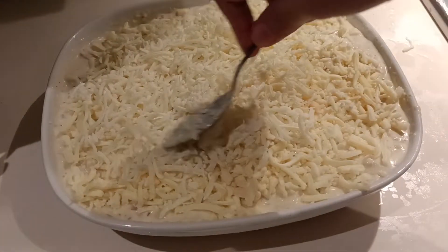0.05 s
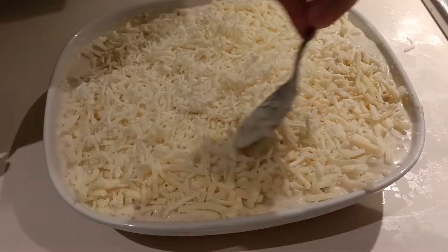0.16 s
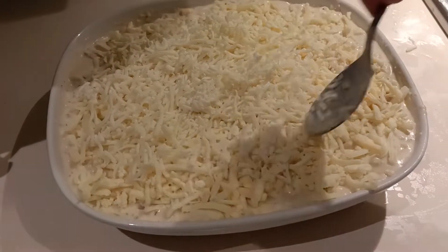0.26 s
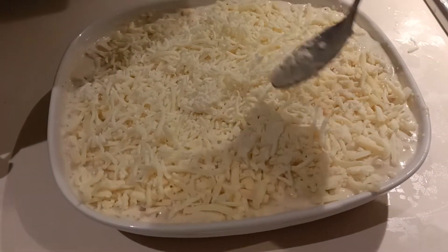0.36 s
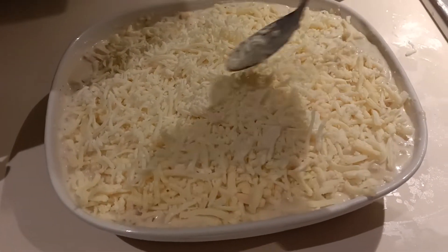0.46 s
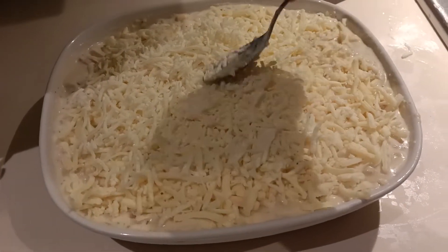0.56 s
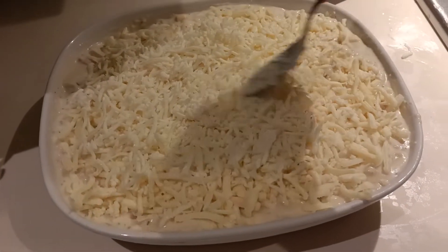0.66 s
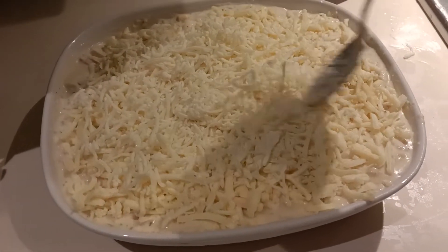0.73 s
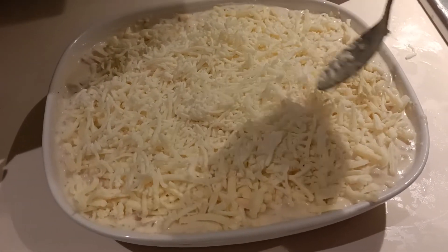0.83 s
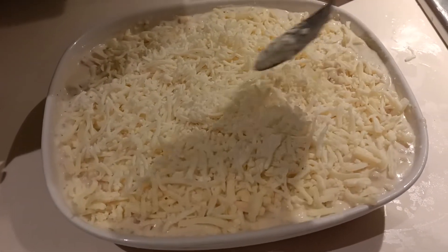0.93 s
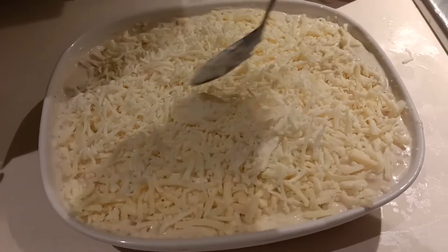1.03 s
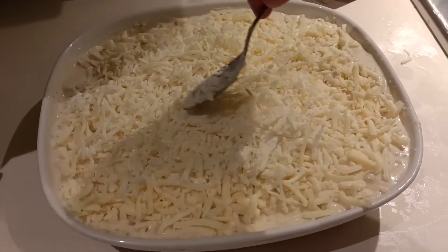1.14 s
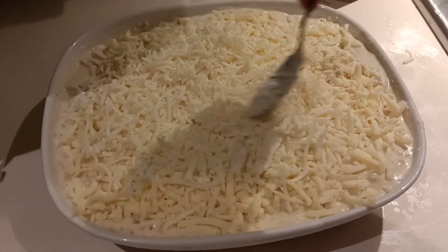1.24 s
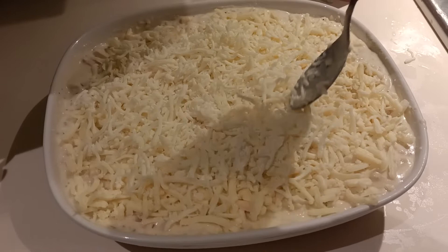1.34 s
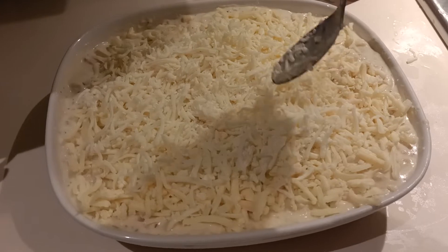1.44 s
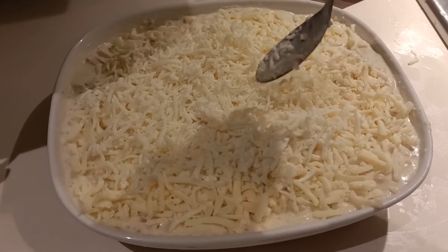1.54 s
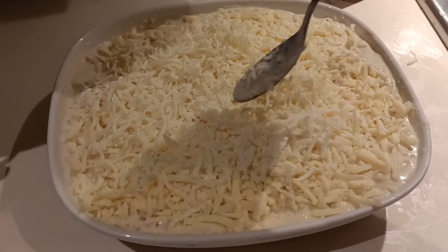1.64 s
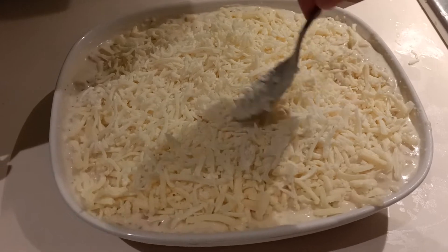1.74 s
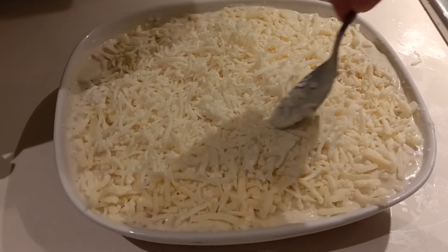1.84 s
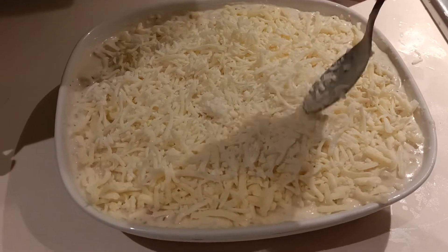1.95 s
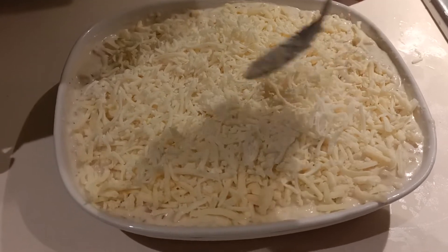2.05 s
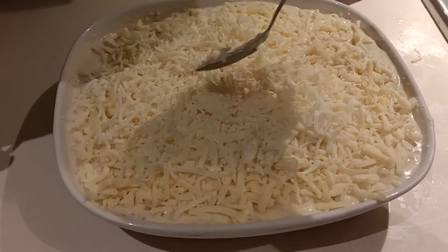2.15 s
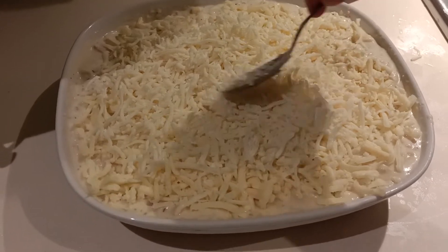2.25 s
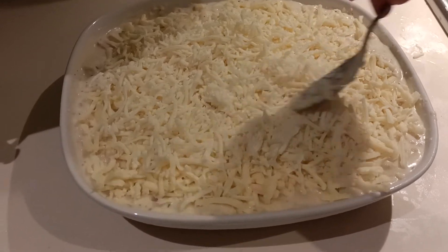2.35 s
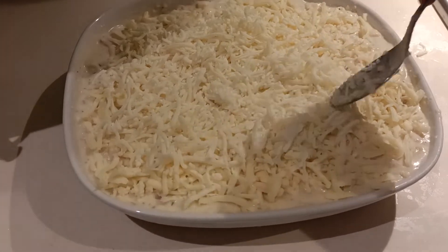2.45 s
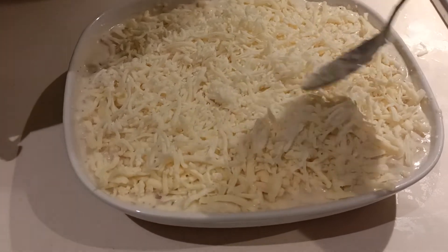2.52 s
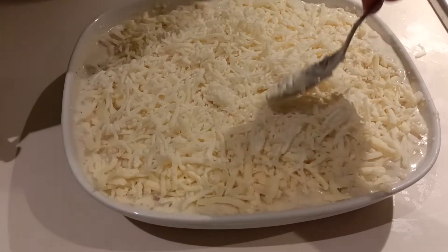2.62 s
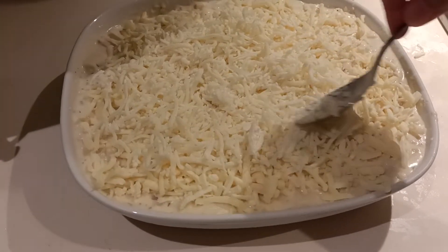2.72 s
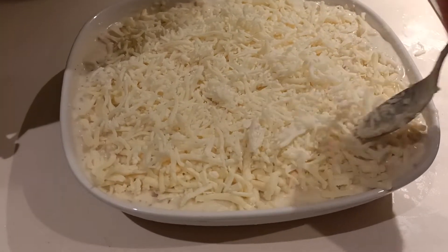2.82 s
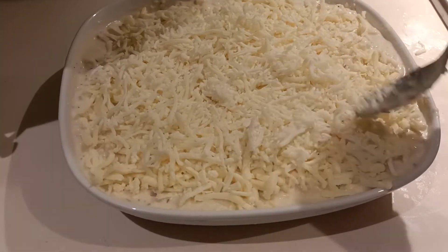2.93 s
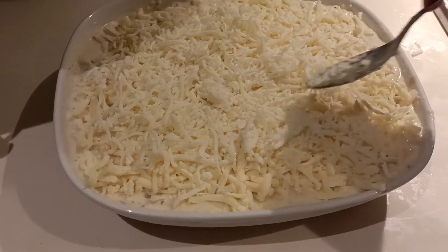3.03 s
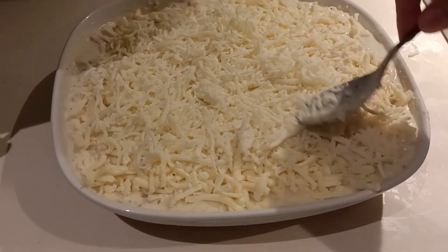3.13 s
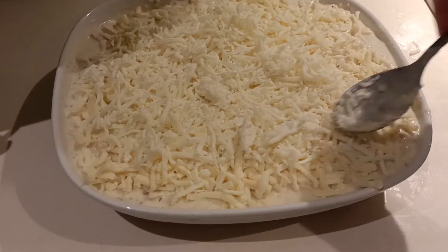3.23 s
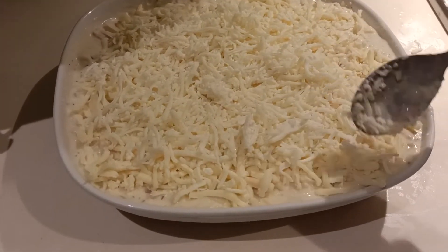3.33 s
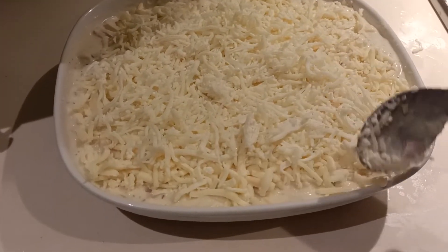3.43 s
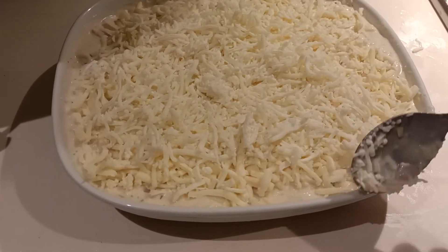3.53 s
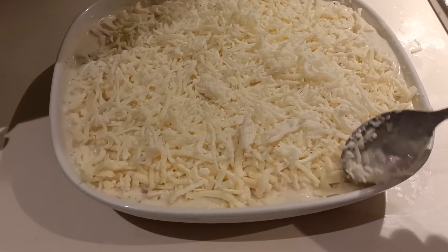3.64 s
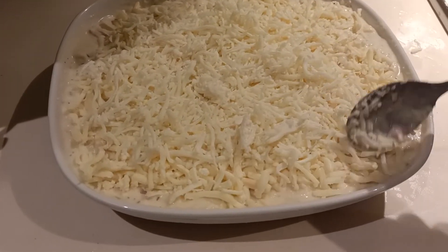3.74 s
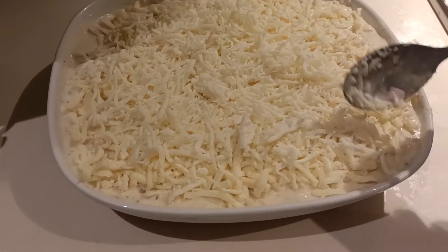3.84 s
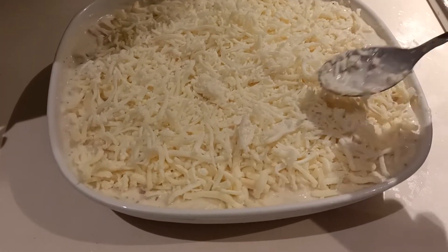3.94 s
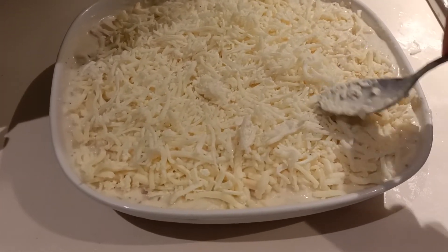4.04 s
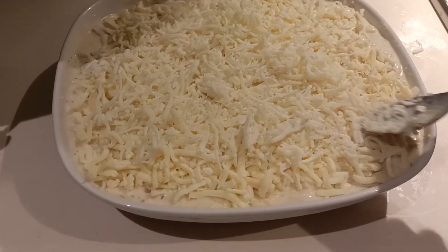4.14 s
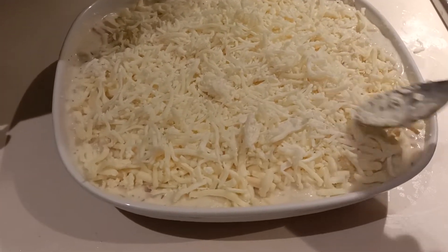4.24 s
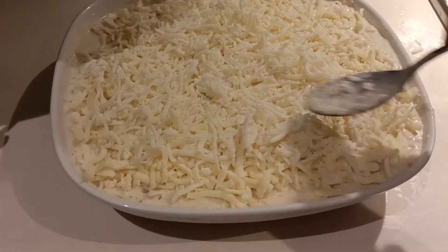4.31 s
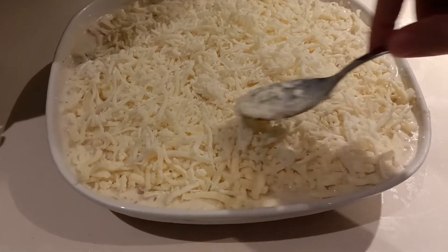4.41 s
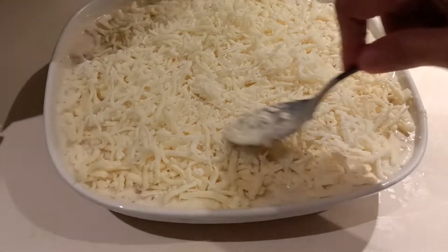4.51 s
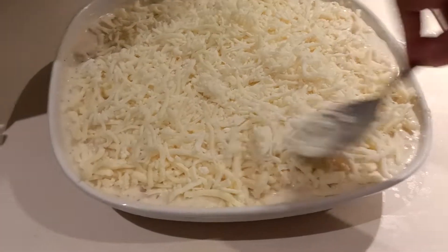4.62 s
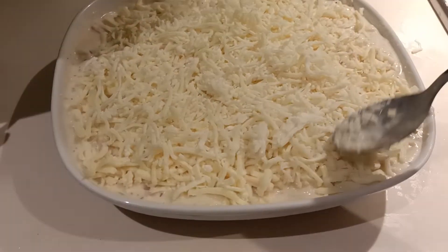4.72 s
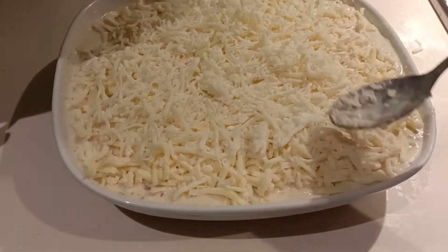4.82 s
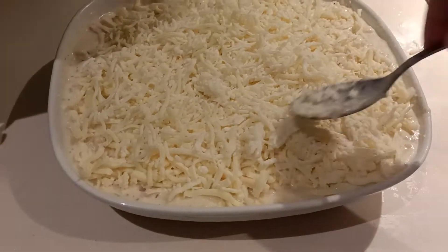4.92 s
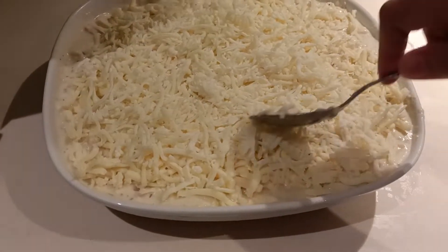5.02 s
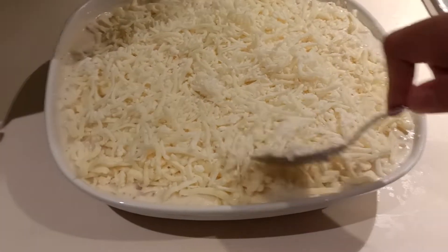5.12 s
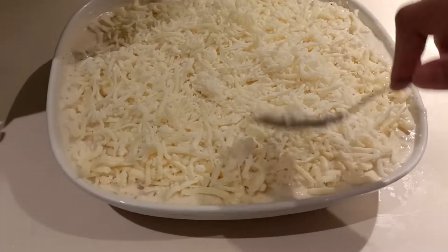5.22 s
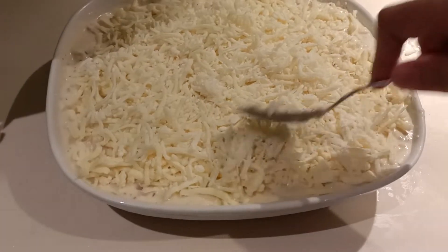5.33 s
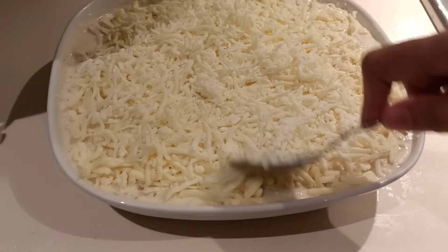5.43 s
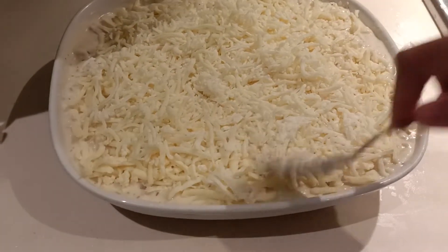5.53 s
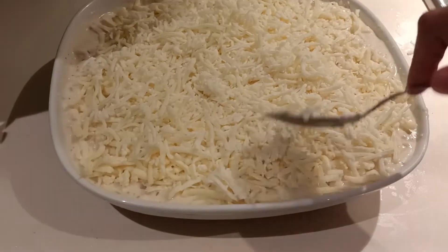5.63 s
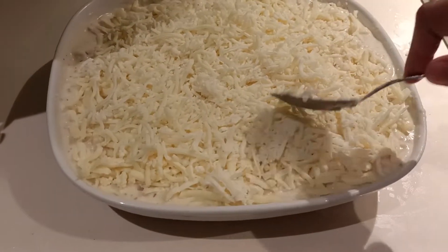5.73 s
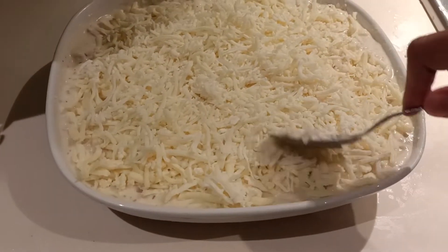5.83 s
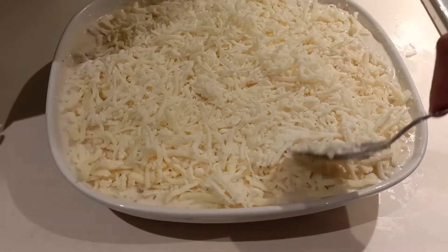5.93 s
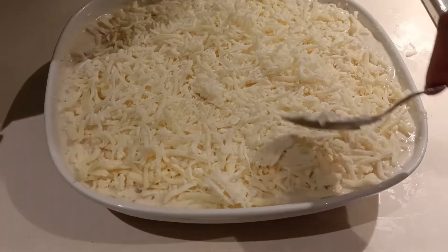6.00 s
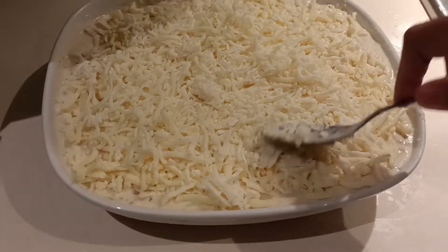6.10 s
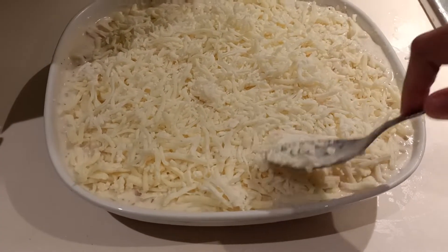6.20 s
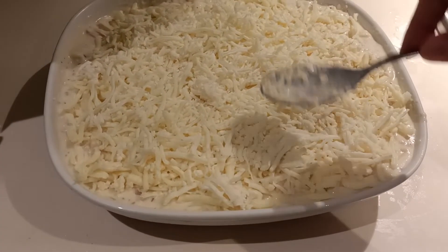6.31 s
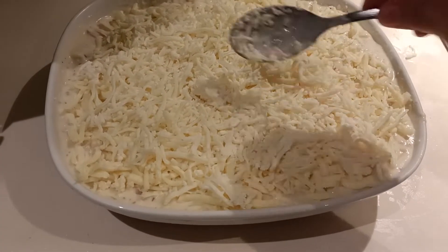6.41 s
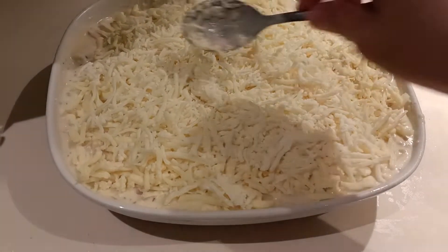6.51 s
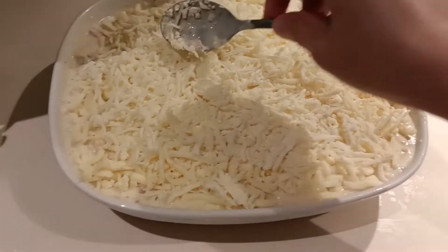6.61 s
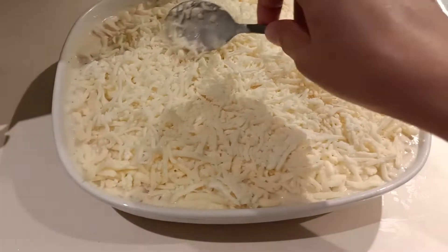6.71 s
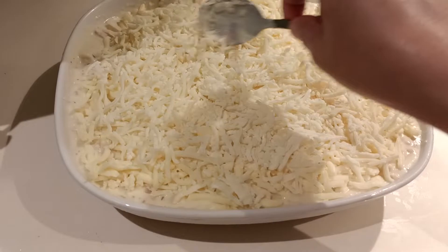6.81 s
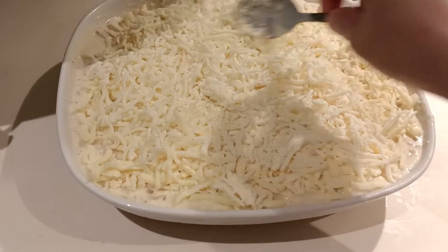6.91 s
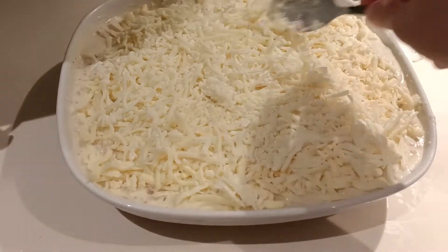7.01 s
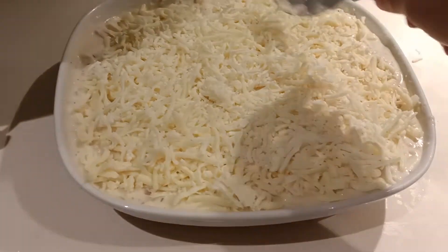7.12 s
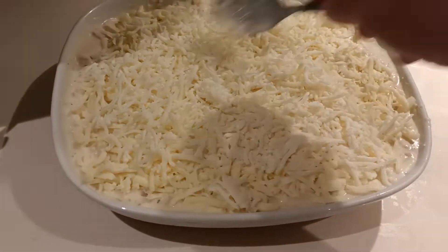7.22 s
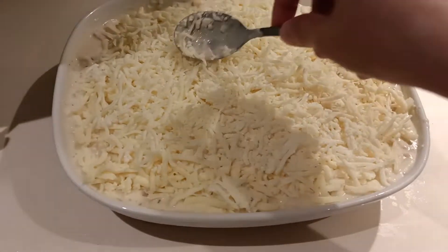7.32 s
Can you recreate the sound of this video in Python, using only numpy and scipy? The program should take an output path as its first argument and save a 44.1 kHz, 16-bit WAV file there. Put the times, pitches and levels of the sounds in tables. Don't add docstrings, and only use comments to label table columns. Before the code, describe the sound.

Close up in a quiet home kitchen, a steel spoon makes faint bright ticks and short grainy scrapes against a ceramic dish, with soft pats on cheese. A pair of sharper taps follows, then one loud, hard knock with a brief ring. After a near-quiet pause, cloth rustles, a latch clacks on the right and a door slams with a hollow boom. Rustling fades over fridge hum.

```python
import sys
import numpy as np
from scipy import signal
from scipy.fft import rfft, irfft
from scipy.io import wavfile
from scipy.ndimage import uniform_filter1d

SR = 44100
rng = np.random.default_rng(int(sys.argv[2]) if len(sys.argv) > 2 else 0)


def boost(x):
    u = np.asarray(x, float) / 20
    return 10 ** u


def log_audio(samples):
    frames = np.atleast_2d(samples).T
    limited = np.clip(frames, -1, 1)
    pcm = np.round(limited * 32767).astype(np.int16)
    wavfile.write(sys.argv[1], SR, pcm)


N = 324576
HZ = np.fft.rfftfreq(N, 1 / SR)
T = np.arange(N) / SR

# mode_hz, level_db, t60_s
SPOON_MODES = [(2500, -20, .04), (3160, 2, 0.079), (4660, -16, 0.048), (5560, -5, 0.038), (6260, 4.5, 0.04),
               (6970, -1.5, 0.058), (7600, -12, .035), (8900, 2, 0.055), (9500, 2.5, .04),
               (10830, 4.5, .045), (11400, 5, .03), (13400, -1, .03), (14800, 0, .03)]


def spoon_ring(bright_hz, spread_octaves):
    hz, db, t60_s = np.transpose(SPOON_MODES)[:, :, None]
    level_luck, pitch_luck = rng.standard_normal((2, len(hz), 1))
    t = T[:SR // 8]
    db = db + 1.9 * level_luck - 6 * (np.log2(hz / bright_hz) / spread_octaves) ** 2
    modes = boost(db - 60 * t / t60_s) * np.sin(2 * np.pi * hz * (1 + 0.0031 * pitch_luck) * t)
    ring = np.sum(modes, axis=0)
    return ring / abs(ring).max()


# start_s, peak_db, brightest_hz, ring_share_db
TICKS = [(0.013, -45.5, 10800, 0), (0.0325, -41, 5640, -7.5), (0.049, -45, 3110, -9.5),
         (0.18, -43, 6160, -15), (0.611, -39.5, 9550, -1), (0.6494, -42, 6040, -9),
         (0.673, -33.5, 6860, -8), (0.519, -55, 13000, -8), (0.7731, -47, 4840, -11),
         (0.8989, -55, 6720, -11), (1.0365, -52, 6800, 1), (1.141, -39, 6260, -2), (1.162, -35.5, 6400, 2),
         (1.1994, -42, 6100, -1), (1.223, -40, 10900, -4), (1.27, -47, 10900, -6), (1.688, -52, 9300, 4),
         (1.73, -58, 9000, 1), (1.6274, -51, 8360, 2), (1.8088, -47, 14500, -12), (2.165, -45.5, 6900, 5.5),
         (2.1794, -47, 6980, -11), (2.204, -38.5, 7600, -7), (2.2393, -25.5, 9500, -8),
         (2.2523, -24, 8100, -8.5), (2.619, -45, 5340, -3), (2.72, -44, 10050, -3),
         (2.7494, -47, 10700, -1), (3.0994, -55.5, 6030, 0), (3.5848, -24, 5200, -3.5),
         (3.9624, -57, 5610, -1), (4.005, -53.5, 5500, 1), (4.0432, -51, 11500, -2),
         (4.385, -62, 2000, -13.5), (4.641, -53, 8000, -7), (7.336, -45, 3150, -5.5)]


def ticks():
    out, t = np.zeros((2, N)), T[:SR // 8]
    pan_db = np.array([[-17], [0]])
    for s, db, hz, ring_db in TICKS:
        edges_hz = [0.67 * hz, min(2.1 * hz, .45 * SR)]
        band = signal.butter(3, edges_hz, "band", fs=SR, output="sos")
        crack = 0.46 * signal.sosfilt(band, rng.standard_normal(len(t))) * np.exp(-t / 0.0022)
        tick = crack + boost(ring_db) * spoon_ring(hz, 0.61)
        add(out, s, tick * boost(db + 2.5 + pan_db))
    return out


# pitch_hz, level_db_per_hz
KNOCK_COLOUR = [(60, -22), (130, -3), (500, 1), (1200, 0.5), (2100, -9.5), (2800, -7), (3500, -1.5),
                (4000, 0), (4700, 4), (5400, -15.5), (6300, 0), (7400, 1.5), (9000, -6), (11000, -0.5),
                (13400, -2.5), (14000, -29), (14700, 2), (15300, 3), (15700, -18)]
# mode_hz, level_db, t60_s
KNOCK_MODES = [(2589, -7, 0.14), (3300, -7, 0.21), (3550, -2, 0.12), (4720, -8, 0.15), (6140, -12, 0.23),
               (6390, -7, 0.15), (7343, -4, 0.16), (7817, -13, 0.29), (8382, -9, 0.2), (9518, -4.5, 0.2),
               (10940, -16, 0.43), (12200, -11.5, 0.17), (13350, -6.5, 0.12), (14710, -10, 0.18),
               (3400, -6, .14), (3780, -10, .15), (4200, -11.5, .12), (4727, -7, 0.16), (5060, -12, .2),
                (5540, -9.5, .15), (5730, -14, .15), (6724, -12.5, .24), (7360, -13, .3), (8900, -14.5, .2),
                (10100, -12, .15), (11200, -4, 0.22), (11700, -12, .15), (14900, -10.5, .2)]


def rim_knock():
    start_s, knock_db, ring_db, chatter_db, chatter_decay_s = 3.5538, -6.5, -24, -9.5, 0.0045
    out, blow, t = np.zeros((2, N)), np.zeros((2, N)), T[:SR // 8]
    noise = rng.standard_normal((3, len(t)))
    high = signal.butter(3, 2400, "high", fs=SR, output="sos")
    chatter = signal.sosfilt(high, 0.5 * noise[0] + noise[1:])
    spike = np.exp(-t / .00007) * np.array([[.25], [1.1]])
    add(blow, start_s, boost(chatter_db) * chatter * np.exp(-t / chatter_decay_s) - spike)
    blow = colour(blow, KNOCK_COLOUR)
    out += boost(knock_db + np.array([[-3], [1.5]])) * blow / abs(blow).max()
    add(out, start_s, boost(knock_db + ring_db) * spoon_ring(8000., 2.5))
    for hz, db, t60_s in KNOCK_MODES:
        add(out, start_s, boost(-39.5 + db - 60 * t / t60_s) * tone(hz + 0 * t, 35))
    return out


# peak_s, peak_db, rise_s, fall_s, brightness_db
STROKES = [(.03, -63.5, 0.13, 0.17, 0.5), (.075, -68, .1, .04, 1), (.175, -67, 0.086, .06, 3),
           (.675, -60, 0.14, 0.052, 0), (.6, -65, 0.29, .15, 0.5), (.4, -70, .4, 0.36, -4),
           (.79, -58, 0.066, 0.089, -10), (.904, -64.5, 0.11, .22, -13), (1.05, -70, .02, .5, -7),
           (1.12, -67.5, 0.088, .2, 4.5), (1.165, -54, 0.014, 0.088, 3), (1.81, -70, .05, .12, -6),
           (1.5, -75, 0.34, 0.083, -1), (1.64, -68, 0.033, 0.58, -4.5), (2.05, -72, .03, 0.22, -32),
           (2.175, -60, .02, 0.027, -3), (2.21, -76, .02, .04, -12), (2.245, -54, 0.024, 0.069, 3),
           (2.33, -75, .1, 1.2, -11), (2.625, -67, .02, 0.091, 3.5), (2.725, -62, 0.026, 0.085, 0.5),
           (2.39, -67.5, .06, 0.1, -12), (2.9, -77.5, .3, 1.3, -8), (4.004, -77, 0.0054, .024, 0),
           (4.088, -77, 0.083, .11, 1), (4.645, -70, 0.069, .02, 4), (5.09, -79, 0.9, .05, -1)]


def scrapes():
    resonance = 1 + sum(0.7 * boost(db) / (1 + ((HZ - hz) / 120) ** 2) for hz, db, _ in SPOON_MODES)
    rub = rfft(grains(3500, 1.66)) * resonance
    bands = (
        [(600, -22), (1300, -2.5), (4500, 1.5), (5500, -44)],
        [(4300, -28.0), (5300, 0.0), (6500, -0.5), (9000, -4.5), (10300, -27.0)],
        [(8800, -30.0), (9800, -2.5), (16000, -6)])
    low, mid, top = (unit(irfft(rub * boost(on_hz(band)), N)) for band in bands)
    drag = boost(-38) * swell(STROKES, -0.21) ** .48
    scrape = swell(STROKES) * mid + drag * low + swell(STROKES, share=1) * top
    return scrape * boost(np.array([[-2.5], [.6]]))


# centre_s, length_s, pitch_hz, level_db
SQUEAKS = [(0.207, 0.046, 1300, -76), (0.658, 0.032, 1303, -66.5), (.65, 0.04, 6200, -65),
           (0.688, .03, 3830, -70), (0.908, 0.031, 6600, -64), (.91, 0.029, 3820, -67.5),
           (0.95, 0.044, 1210, -75.5), (1.042, 0.01, 6750, -54), (1.065, 0.022, 6800, -60),
           (1.138, 0.064, 1220, -75), (1.17, 0.021, 3160, -66), (1.203, 0.017, 3160, -61),
           (2.254, 0.015, 3160, -57), (2.73, .03, 2350, -75), (1.053, 0.022, 7760, -65),
           (1.06, 0.03, 8900, -71), (1.09, 0.041, 5900, -67), (1.18, 0.047, 6170, -60),
           (1.188, 0.052, 10940, -68), (1.2, 0.024, 5400, -71), (6.8, 0.016, 5040, -51),
           (1.083, .04, 8340, -66), (1.09, 0.044, 7600, -64), (4.01, 0.009, 5550, -66),
           (4.012, 0.008, 7200, -73), (4.105, .01, 5830, -72.5), (4.648, 0.01, 5600, -66),
           (5.1, .008, 9400, -75), (4.57, .035, 5550, -78)]


def squeaks():
    out, t = np.zeros(N), T[:SR // 4]
    half_s = t[-1] / 2
    for s, length_s, hz, db in SQUEAKS:
        fade = np.exp(-((t - half_s) / length_s) ** 2)
        add(out, s - half_s, boost(db) * tone(hz + 0 * t, 0.0074 * hz) * fade)
    return out


def spoon():
    out = ticks() + rim_knock() + scrapes()
    out[0] = np.roll(out[0], 17)
    return out + boost(-1.5) * squeaks()


# centre_s, length_s, level_db
PATS = [
    (0.226, 0.1, -58.5),
    (0.802, 0.054, -57.5),
    (1.25, 0.046, -64),
    (2.704, 0.041, -60),
]


def pats():
    push = sum(boost(db) * np.exp(-(np.clip(T - s, -1, 1) / length_s) ** 2) for s, length_s, db in PATS)
    return push * diffuse([(100, -26), (200, 5.5), (700, 0.0), (1500, -14.5), (3000, -17), (5000, -46)])


# centre_s, peak_db, pitch_hz, sign, left_minus_right_db
BUMPS = [(.79, -49.5, 54.7, 1, 3), (2.709, -39.5, 66.4, -1, 20), (2.989, -43, 44.8, 1, 16),
         (3.015, -42.5, 65, 1, 16), (5.922, -39, 71.4, -1, 22), (6.09, -30, 40, 1, 3),
         (6.191, -25.5, 54.6, 1, 6), (6.255, -19.5, 73.4, 1, 4.5), (6.345, -35.5, 64, 1, -6),
         (6.4, -39, 65.7, 1, -5)]


def bumps():
    out = np.zeros((2, N))
    t = T[:SR // 5] - T[SR // 10]
    for s, db, hz, sign, pan_db in BUMPS:
        level = sign * boost(db + pan_db * np.array([[.5], [-.5]]))
        add(out, s + t[0], level * np.cos(2 * np.pi * hz * t) * np.exp(-(1.56 * hz * t) ** 2))
    return out


# start_s, level_db, clatter_decay_s
LATCH = (5.598, -19, 0.036)
SLAM = (5.9765, -9, 0.042)
# pitch_hz, level_db_per_hz
LATCH_COLOUR = [(180, -35), (300, -12), (447, -6), (713, -18), (1230, -5), (1700, -1), (2100, -2),
                (2700, -10), (3700, -5), (9880, -20.5), (13300, -26), (15200, -32), (16000, -77)]
SLAM_COLOUR = [(160, -37.5), (280, -23), (370, -9), (530, -4), (800, -10.5), (1330, -9), (1700, -5),
               (2400, -4.5), (3300, -8.5), (4800, -14), (11000, -21.5), (14300, -25), (15300, -54)]


def door_clatter():
    out = np.zeros(N)
    low = signal.butter(3, 900, fs=SR, output="sos")
    for (s, db, decay_s), table in ((LATCH, LATCH_COLOUR), (SLAM, SLAM_COLOUR)):
        since = np.clip(T - s, 0, 9)
        burst = np.exp(-since / decay_s) * (1 - np.exp(-since / .002))
        hit = colour(grains(6000, 1.3) * burst, table)
        body = signal.sosfiltfilt(low, hit)
        late_body = boost(-1.5) * body * (1 - np.exp(-(since / 0.016) ** 2))
        out += boost(db) * (hit - body + late_body)
    return out


# start_s, peak_db, ring_hz, t60_s
IMPACTS = [(5.5992, -30.5, 3670, 0.018), (5.61, -35, 3330, 0.034), (5.628, -42, 3730, .02),
           (5.64, -34, 2150, .03), (5.642, -40, 4100, .012), (5.665, -45, 3370, .03),
           (5.665, -46, 1970, .03), (5.613, -29, 1780, .04), (5.62, -34, 2100, .03),
           (5.638, -35, 3600, 0.017), (5.68, -40, 3400, .03), (5.9785, -13.5, 2920, 0.011),
           (5.989, -14, 2260, 0.025), (5.994, -22, 1470, 0.062), (6.003, -22, 2220, 0.023),
           (6.014, -27, 2900, 0.016), (6.031, -32, 3080, 0.016), (6.144, -44, 4200, .03),
           (6.152, -38.5, 2094, 0.075), (6.17, -39, 2196, 0.037), (6.35, -47.5, 1520, .05)]


def door_impacts():
    out, t = np.zeros(N), T[:SR // 10]
    for s, db, hz, t60_s in IMPACTS:
        ring = tone(hz + 0 * t, 99.0) + 0.43 * tone(1.2 * hz + 0 * t, 400.0)
        add(out, s, boost(db - 60 * t / t60_s) * ring / 2)
    return out


# peak_s, peak_db, rise_s, fall_s, pitch_hz
HOLLOW = [(5.61, -47, 0.015, 0.012, 420), (5.645, -53.5, 0.044, .06, 520), (5.7, -55, 0.021, 0.024, 340),
          (5.99, -43, 0.013, 0.014, 420), (6.005, -33, 0.02, 0.024, 375), (6.012, -35.5, 0.029, 0.027, 503),
          (6.022, -40.5, 0.033, 0.031, 556), (6.034, -31, 0.018, 0.029, 365.4),
          (6.065, -39.5, 0.027, .03, 324.3), (6.097, -39, 0.035, 0.044, 295),
          (6.06, -48, 0.056, 0.057, 659), (6.095, -48, 0.032, 0.028, 540),
          (6.035, -34, 0.036, 0.038, 146.8), (6.083, -39.5, 0.026, .03, 159.4),
          (6.159, -53.5, .04, 0.022, 340), (6.21, -56, .04, 0.034, 339.6), (6.2, -56.5, 0.11, 0.13, 609),
          (6.35, -55, 0.073, 0.069, 297)]


def door_hollow():
    out, t = np.zeros(N), T[:SR // 4]
    half_s = t[-1] / 2
    for s, db, rise_s, fall_s, hz in HOLLOW:
        drop_db = 20 * np.maximum((half_s - t) / rise_s, (t - half_s) / fall_s)
        add(out, s - half_s, boost(db - drop_db) * tone(hz + 0 * t, 9.4))
    return out


PANEL = {"latch": [(5.625, -41.5, .04, 0.14), (5.69, -35.5, 0.11, .1)], "slam": [(6.003, -14, 0.032, 0.044),
         (6.046, -17, 0.036, 0.074), (6.095, -24, .07, 0.091), (6.158, -24.5, 0.058, .02)],
         "rebounds": [(6.202, -24.5, 0.043, 0.035), (6.26, -35, 0.029, 0.069), (6.366, -40.5, 0.35, 0.069)]}
PUSH_S = {"latch": 5.59, "slam": 5.985, "rebounds": 6.18}


def panel_boom():
    latched_hz, struck_hz, free_hz, settle_s = 69.5, 81.5, 95.7, 0.07
    since = T - PUSH_S["slam"]
    settling_hz = free_hz - (free_hz - struck_hz) / (1 + (since / settle_s) ** 6)
    hz = np.where(since < 0, latched_hz, settling_hz)
    boom, total_push = np.zeros(N), np.zeros(N)
    starts = list(PUSH_S.values()) + [T[-1]]
    for rows, start, end in zip(PANEL.values(), starts, starts[1:]):
        push = uniform_filter1d(swell(rows) * (T >= start) * (T < end), size=300)
        boom -= push * np.sin(2 * np.pi * np.cumsum(hz * (T >= start)) / SR)
        total_push += push
    return np.sqrt(2) * boom, total_push


# peak_s, peak_db, rise_s, fall_s
RATTLE = (6, -31, 0.02, 0.29)


def frame_rattle(push):
    shake = swell([RATTLE]) + boost(-24) * uniform_filter1d(push, size=2000)
    return shake * diffuse([(40, -27), (70, 20), (105, 0), (140, 6.0), (170, 0), (240, -20.0),
                            (320, -3.5), (400, -28.5)])


# peak_s, peak_db, rise_s, fall_s, pitch_hz
SWAY = [(5.955, -40, .1, .02, 34.4), (5.992, -22, 0.011, 0.2, 31.6), (6.147, -30, .08, 0.061, 31.6),
        (6.305, -32.5, .012, 0.16, 22), (6.43, -47.5, .08, 0.85, 20.3), (6.62, -46, 0.55, 0.11, 20.3),
        (6.71, -53, .15, 0.077, 17)]


def air_sway():
    since = T - PUSH_S["slam"]
    sway = sum(swell([row]) * np.sin(2 * np.pi * row[4] * since) for row in SWAY)
    return np.sqrt(2) * boost(-3.0) * sway


# peak_s, peak_db, rise_s, fall_s, treble_db
RUSTLE = [(5.25, -68.5, .18, 0.18, 5), (5.34, -75, .2, .2, 7), (5.43, -55.5, 0.11, 0.14, 3),
          (5.5, -70.5, 0.24, 0.2, 6), (5.596, -54, 0.011, 0.46, 3.5), (5.74, -61.5, 0.093, 0.42, 10),
          (5.86, -65.5, 0.23, 0.17, 8.5), (5.976, -34.5, 0.011, 0.16, -19), (6.154, -50, 0.025, 0.22, -2),
          (6.27, -65, 0.38, 0.22, 7), (6.34, -63.5, 0.12, 0.13, 8), (6.48, -68.5, 0.12, 1.1, 10),
          (6.72, -66, 0.23, 0.19, 13.5), (6.8, -52.5, 0.068, 0.25, 5.5), (7.04, -74.5, .5, 1.4, 8),
          (7.346, -66, 0.089, 0.028, 6)]
# pitch_hz, level_db_per_hz
RUSTLE_LOW = [(530, -47), (900, -12.5), (1600, -16.5), (2300, -5.5), (3200, -3), (4500, -4), (6760, -9.5),
              (11400, -57)]
RUSTLE_TOP = [(2000, -19), (3300, -9.5), (4800, -5), (5280, -2), (5560, 0.5), (11700, -4), (14800, -7.5),
              (15600, -22)]
# peak_s, peak_db, rise_s, fall_s
SLIDES = [(5.415, -54, 0.035, 0.092), (5.45, -56.5, 0.057, 0.046), (5.62, -59, 0.035, 0.22),
          (6.16, -52.5, 0.088, 0.2), (6.24, -68, .08, 0.11), (6.35, -68, 0.06, 0.21), (6.81, -67, .05, .2),
          (6.55, -76, .3, .5)]
# pitch_hz, level_db_per_hz
SLIDE_COLOUR = [(600, -46), (1100, -12), (1700, -8.5), (2200, 2), (2800, -7.5), (3300, -2.5), (4200, -19),
                (6000, -43)]


def cloth():
    flicker = boost(0.98 * unit(uniform_filter1d(rng.standard_normal((3, N)), size=500)))
    low = flicker[0] * swell(RUSTLE) * diffuse(RUSTLE_LOW)
    top = flicker[1] * swell(RUSTLE, share=0.92) * diffuse(RUSTLE_TOP)
    slide = flicker[2] * swell(SLIDES) * diffuse(SLIDE_COLOUR)
    return boost(1.5) * (low + top + slide)


# peak_s, peak_db, rise_s, fall_s
WHINE = [(2.3, -73, .1, .25), (2.47, -74, .3, 0.46), (2.7, -77, .3, .25), (3.0, -83, .2, .3),
         (3.24, -83, .2, .4)]


def whine():
    hz = 7230 - 400 * np.exp(-np.clip(T - 2.25, 0, 9) / 0.34)
    return tone(hz, 100.0) * swell(WHINE)


# pitch_hz, level_db, width_hz
HUM = [(98.5, -61.5, 3.56), (197, -72.5, 6.1), (294.7, -72.5, 6.63), (332.5, -76, 9.46)]


def fridge():
    return sum(boost(db) * tone(hz + 0 * T, width_hz) for hz, db, width_hz in HUM)


# pitch_hz, level_db_per_hz
AIR_COLOUR = [(11, -34), (18, -7), (42, -2.5), (68, -14.5), (83, -9.5), (102, -3.5), (190, -8.5),
              (250, -18.5), (291, -5.5), (326, -7), (544, -12), (1050, -25), (1300, -24.5), (1600, -28.5),
              (4720, -33.5), (5590, -37.5), (14700, -41.5), (16000, -52)]


def kitchen_air():
    return boost(-57) * diffuse(AIR_COLOUR)


# pitch_hz, t60_s
ROOM_T60 = [(200, 0.55), (1500, 0.19), (3500, 0.23), (12000, 0.24)]


def room(x):
    t = T[:SR // 2]
    noise = rfft(diffuse([(20, 0), (20000, 0.0048)])[:, :len(t)])
    bin_hz = np.fft.rfftfreq(len(t), 1 / SR) + 1
    f, t60_s = np.transpose(ROOM_T60)
    tail = 0
    for hz in 125 * 2. ** np.arange(8):
        share = np.clip(1 - abs(np.log2(bin_hz / hz)), 0, 1)
        decay = boost(-60 * t / np.interp(np.log(hz), np.log(f), t60_s))
        fall = decay * (1 - np.exp(-t / 0.0021))
        tail = tail + irfft(noise * share, len(t)) * fall / np.sqrt(np.sum(fall ** 2))
    return signal.oaconvolve(x[None], tail, axes=1)[:, :N]


def diffuse(table):
    port_gap_s = 0.00055
    alike = np.clip(0.79 * np.sinc(2 * HZ * port_gap_s), -1, 1)
    mid, side = rfft(rng.standard_normal((2, N))) * np.sqrt([1 + alike, 1 - alike])
    return unit(irfft(np.array([mid + side, mid - side]) * boost(on_hz(table)), N))


def grains(rate_hz, spread_db):
    event, sign, size = rng.random((3, N))
    clicks = (event < rate_hz / SR) * np.sign(sign - .5)
    return unit(clicks * boost(-spread_db * np.log(size + 1e-9)))


def tone(hz, width_hz):
    wander = np.cumsum(rng.standard_normal(len(hz))) * np.sqrt(2 * np.pi * width_hz / SR)
    return np.sqrt(2) * np.sin(2 * np.pi * np.cumsum(hz) / SR + wander)


def swell(rows, share=0):
    s, db, rise_s, fall_s = np.array(rows).T[:4, :, None]
    t = T[::64]
    drop_db = 20 * np.maximum((s - t) / abs(rise_s), (t - s) / abs(fall_s))
    db = db + share * np.array(rows)[:, -1:] - drop_db
    power = np.sum(boost(2 * np.maximum(db, -200)), axis=0)
    return np.interp(T, t, np.sqrt(power))


def on_hz(table):
    f, v = np.transpose(table)
    return np.interp(np.log(HZ + 1), np.log(f), v)


def colour(x, table):
    cepstrum = irfft(on_hz(table) * np.log(10) / 20, N)
    cepstrum[1:N // 2] *= 2
    cepstrum[N // 2 + 1:] = 0
    return irfft(rfft(x) * np.exp(rfft(cepstrum)), N)


def unit(x):
    return x / np.sqrt(np.mean(x ** 2))


def add(out, s, x):
    i = int(s * SR)
    out[..., i:i + x.shape[-1]] += x[..., :N - i]


def scene():
    near = spoon()
    clatter, impacts, hollow = door_clatter(), door_impacts(), door_hollow()
    boom, push = panel_boom()
    thin = signal.sosfilt(signal.butter(2, 2000, "high", fs=SR, output="sos"), near[1])
    wet = room(boost(-12) * thin + boost(0.5) * clatter + boost(-4.5) * impacts + boost(-8.0) * hollow)
    direct = boost(-2) * clatter + boost(3.5) * impacts
    door = np.array([np.roll(direct, 13), direct]) + hollow + boom + air_sway() + frame_rattle(push)
    return near + pats() + bumps() + door + wet + cloth() + whine() + fridge() + kitchen_air()


# pitch_hz, left_minus_right_db
PORTS = [(60, -2.5), (400, 0), (900, 1), (2400, -1.5), (8000, -6.5), (15000, -2)]


def roll_off(x):
    return signal.sosfilt(signal.butter(12, 16660, fs=SR, output="sos"), x)


def record(dry):
    tilt_db = on_hz(PORTS) / 2
    top = np.clip((15850 - HZ) / 300, .01, 1)
    mix = irfft(rfft(dry) * boost(np.array([tilt_db, -tilt_db])) * top, N)
    return roll_off(mix)


dry = scene()
out = record(dry)
log_audio(out)
```